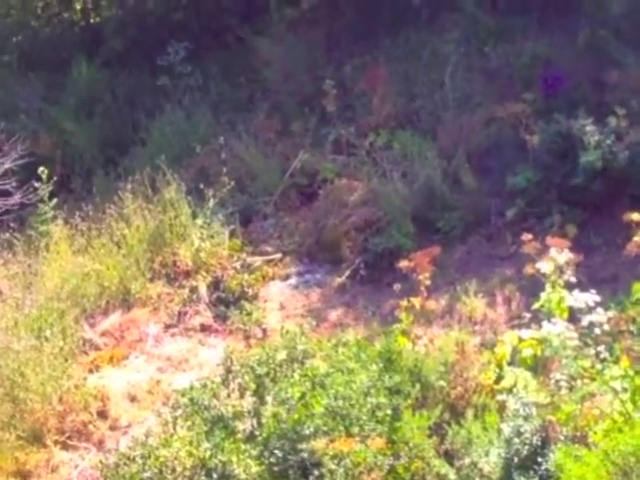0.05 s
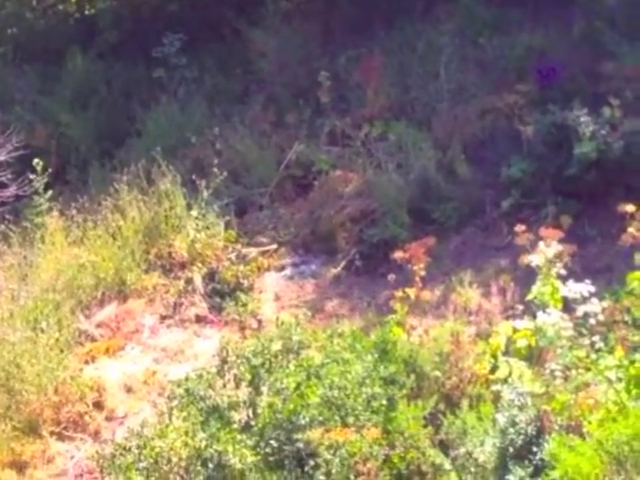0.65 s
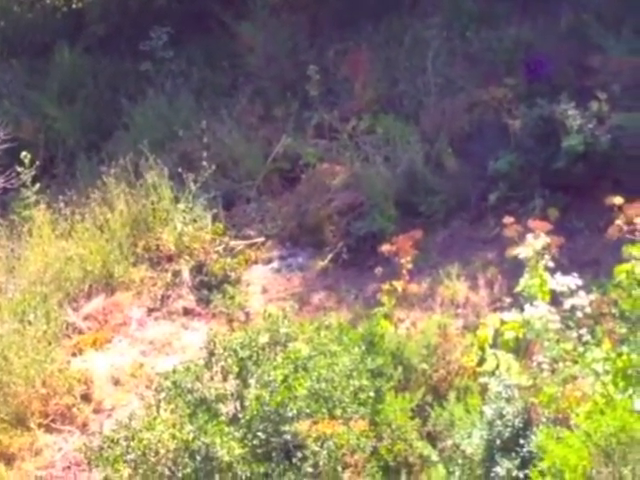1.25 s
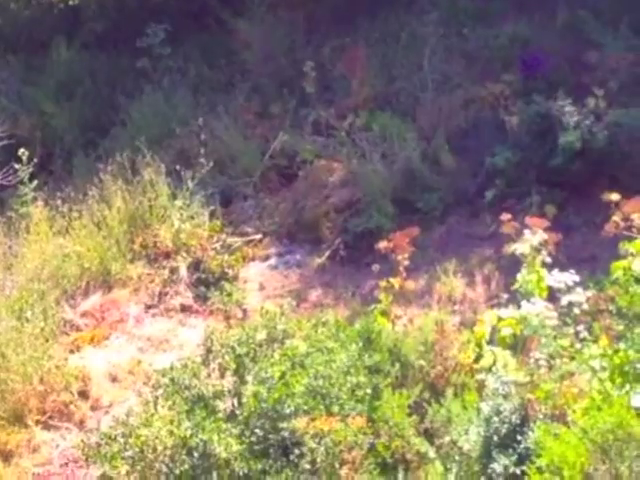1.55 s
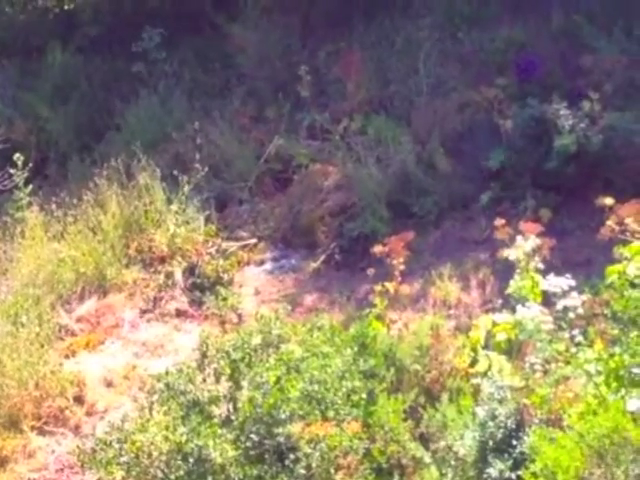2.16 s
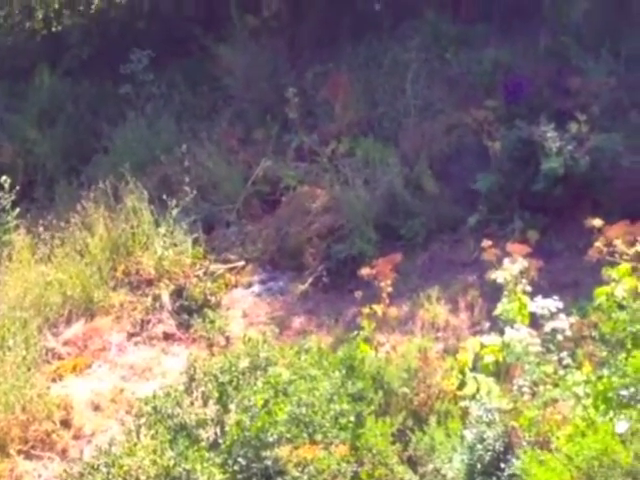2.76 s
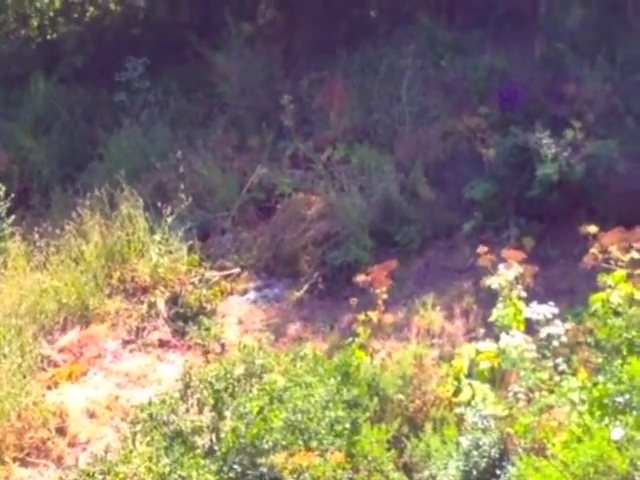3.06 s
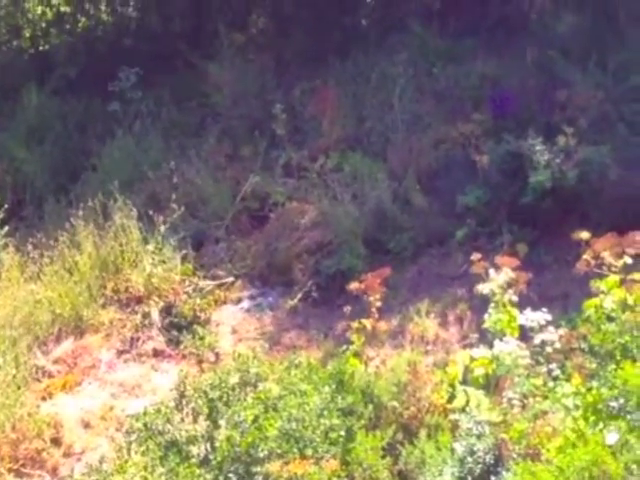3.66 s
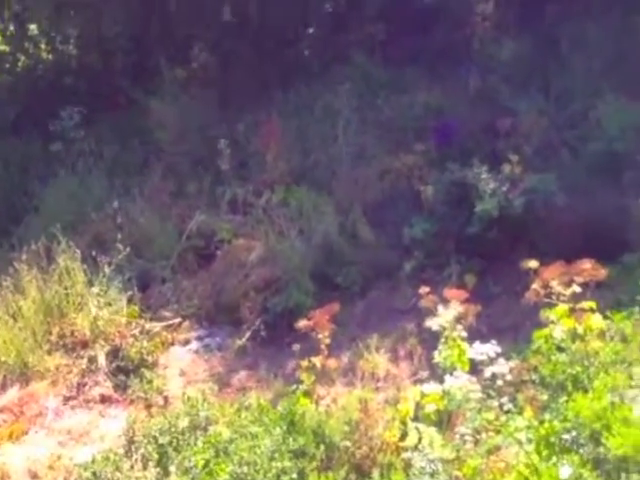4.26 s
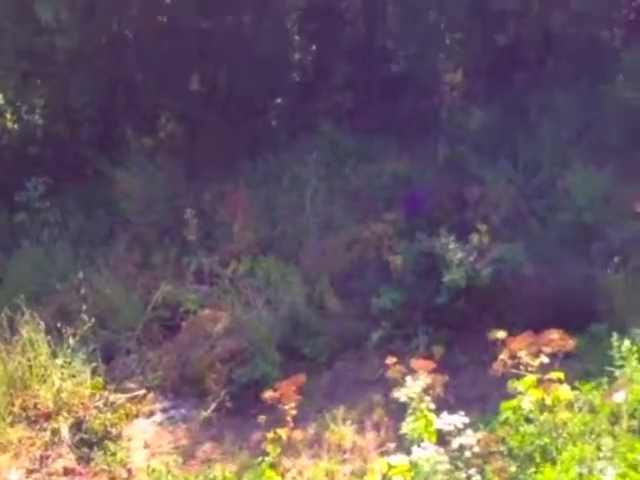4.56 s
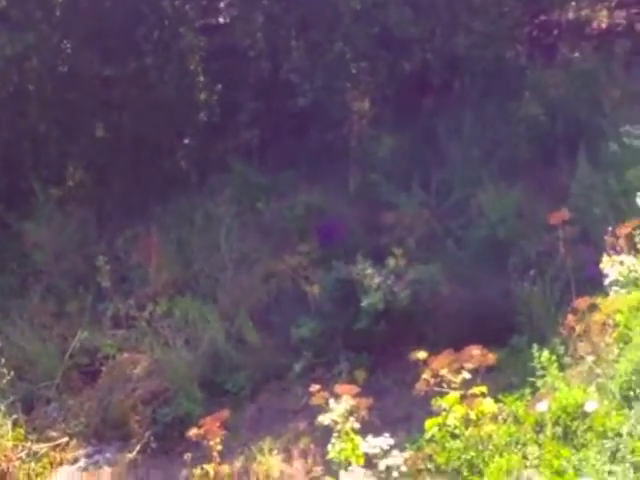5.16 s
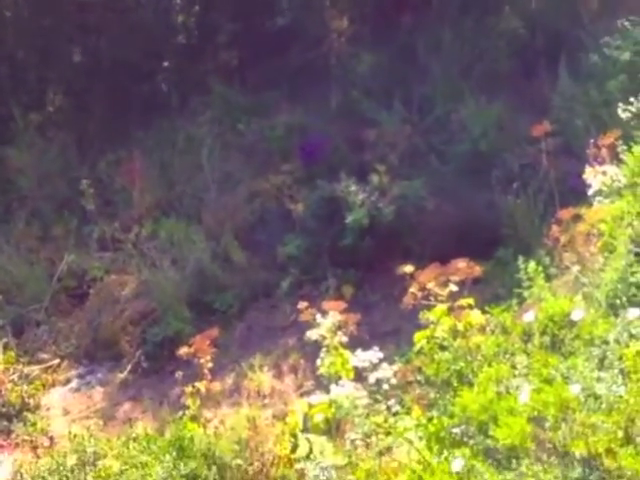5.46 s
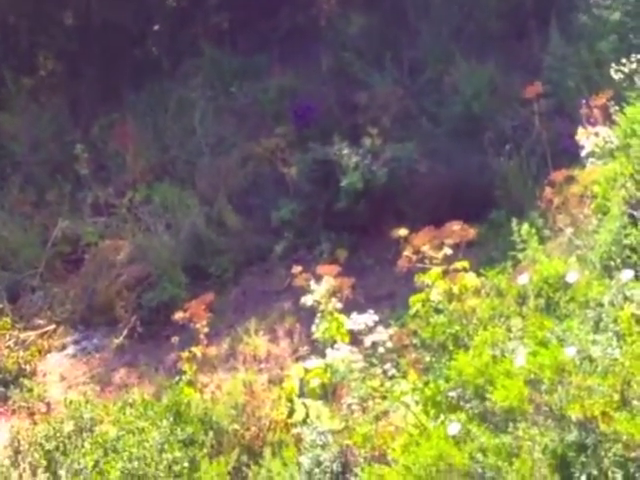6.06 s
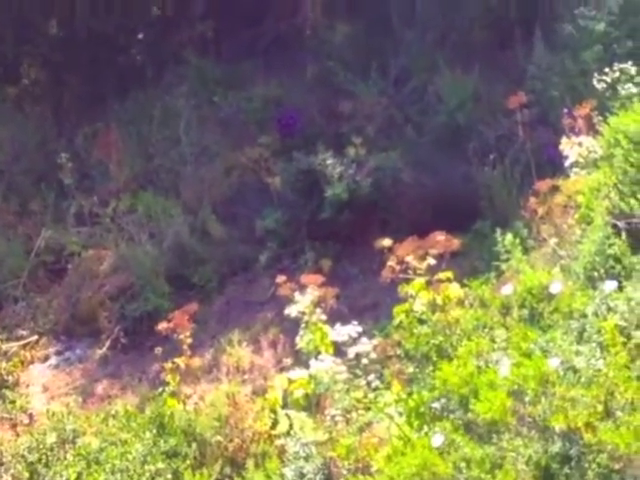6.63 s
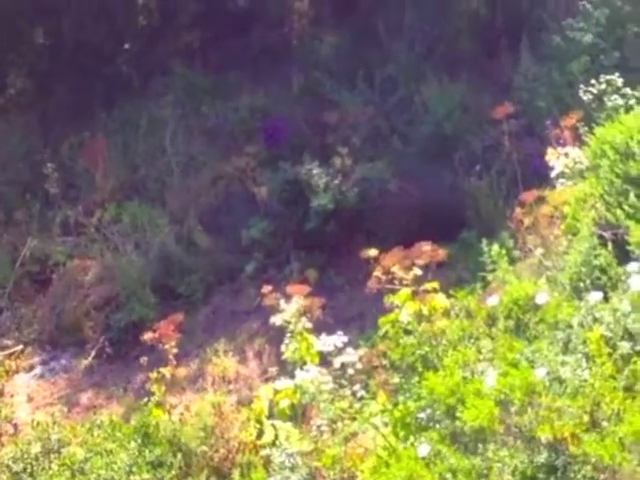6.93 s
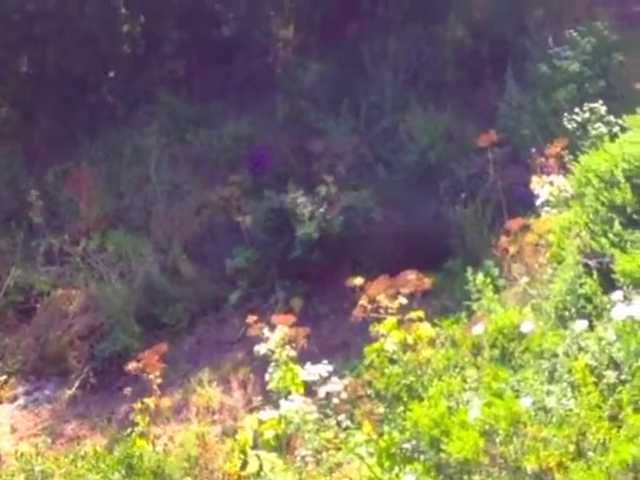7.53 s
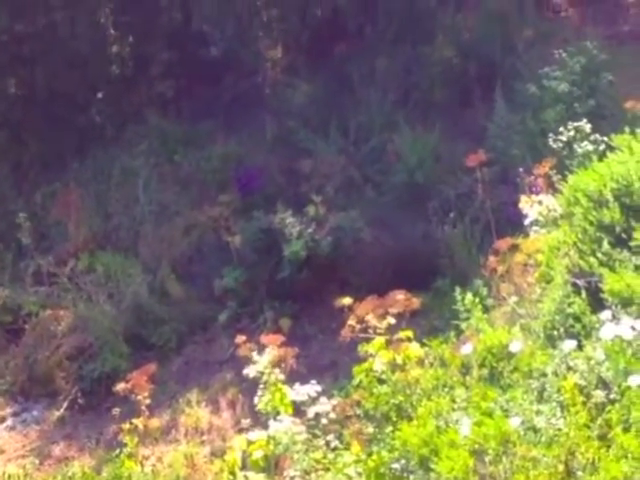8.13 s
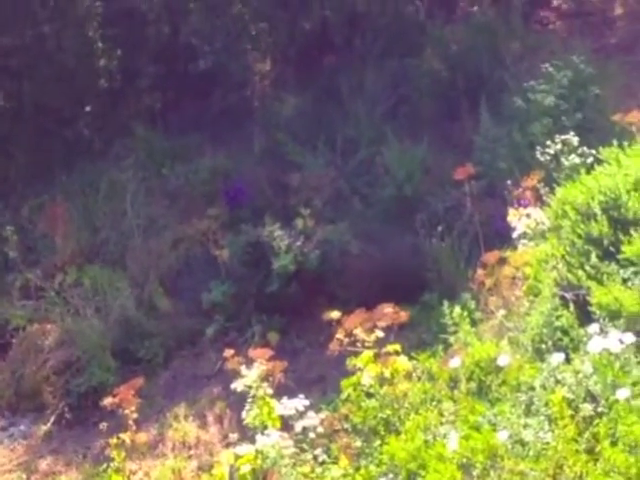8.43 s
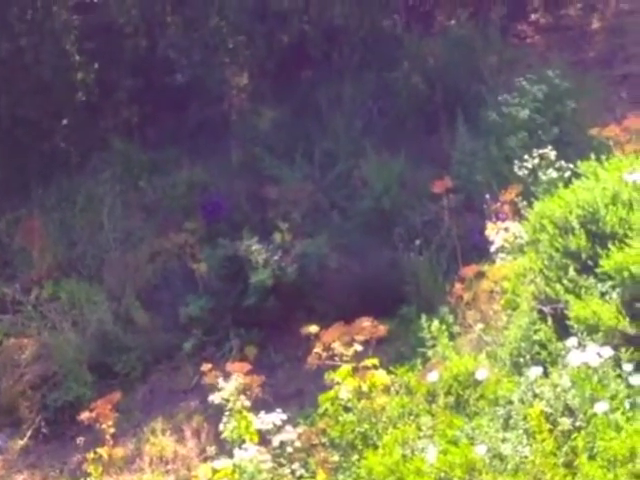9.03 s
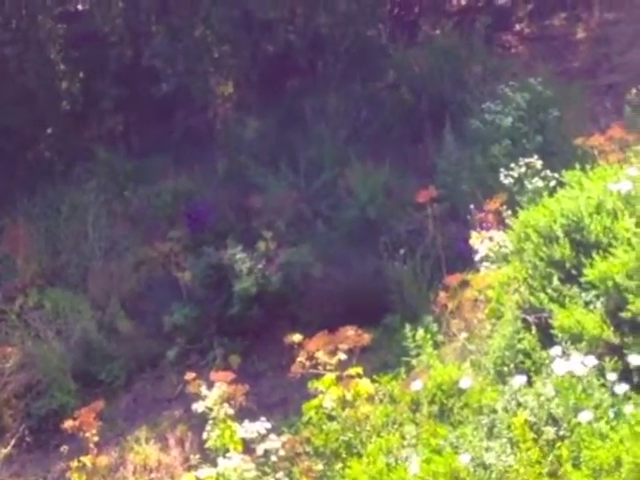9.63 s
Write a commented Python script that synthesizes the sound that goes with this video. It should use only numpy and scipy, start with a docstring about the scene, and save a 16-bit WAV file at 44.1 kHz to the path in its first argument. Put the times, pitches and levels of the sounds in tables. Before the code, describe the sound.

Wind thumps and flutters on the microphone of a hand-held camera on a brushy hillside, over the steady low rush of a far valley. Small birds chirp, whistle and trill faintly. The hand rustles and ticks lightly on the plastic case, which gives one sharp snap about halfway, then a duller tap. Near the end the gusts ease and a distant engine drones faintly.

```python
"""Gusts of wind thump and flutter on the microphone of a hand-held camera on a brushy hillside.
Behind them lie the steady rush of a far valley and a faint hiss. Small birds whistle, chirp and
trill, echoed by the scrub and the slope. The hand rustles and ticks on the plastic case, which
rings with one sharp snap and one duller tap. Towards the end a far engine drones faintly."""
import sys
import numpy as np
from scipy import signal
from scipy.fft import rfft, irfft, next_fast_len
from scipy.io import wavfile
from scipy.ndimage import uniform_filter1d, map_coordinates

SR = 44100
rng = np.random.default_rng(int(sys.argv[2]) if len(sys.argv) > 2 else 0)


def transcribe(signal):
    """Save signal, clipped to [-1, 1], as a 16-bit WAV file at the path in sys.argv[1]."""
    frames = np.atleast_2d(signal).T
    limited = np.clip(frames, -1, 1)
    pcm = np.round(limited * 32767).astype(np.int16)
    wavfile.write(sys.argv[1], SR, pcm)


N = 436149

# Levels in the tables are relative; the functions set the final loudness.
# the light breeze that never stops: t/s, level/dB
BREEZE_LEVEL = [(0, -56), (2.2, -58), (3.5, -58), (4.6, -55), (6.2, -59), (8, -60), (9.89, -60.5)]
# gusts on top of it: t/s of the crest, length/s, level/dB
GUST_SWELLS = [(0.033, 0.14, -42.5), (0.347, 0.058, -46), (0.502, 0.085, -42), (0.688, 0.14, -49),
               (0.886, 0.094, -51.5), (1.106, 0.062, -55), (1.57, 0.18, -52.5), (1.867, 0.096, -48),
               (2.4, .05, -51), (2.754, 0.25, -46), (3.068, 0.084, -48.5), (3.808, 0.086, -51),
               (4.021, .07, -46.5), (4.172, 0.086, -49.5), (4.35, 0.16, -47), (4.9, 0.092, -50),
               (5.105, 0.09, -44), (5.27, 0.19, -47), (5.622, 0.065, -47), (6.68, 0.046, -50),
               (7.237, .05, -54), (7.346, 0.066, -50.5), (7.633, 0.029, -53), (7.813, 0.15, -50.5),
               (8.021, 0.057, -49.5)]
# tone colour of the wind's low rumble and of its higher flutter: f/Hz, level/dB
RUMBLE_COLOUR = [(20, -51), (45, -37), (70, -18), (110, -4), (160, 2), (230, -4), (330, -23.5),
                 (500, -29.5), (800, -44), (1600, -60)]
FLUTTER_COLOUR = [(120, -19.0), (280, 9.0), (600, -14.5), (1500, -34), (4000, -60)]
# tone colour of the valley's rush, the hiss and rubbing cloth: f/Hz, level/dB
VALLEY_COLOUR = [(30, -39), (80, -17.5), (140, -8), (210, 0), (300, -2.5), (500, -8), (750, -11.5),
                 (1100, -18.5), (1600, -26), (2500, -29.5), (5000, -37), (12000, -53)]
HISS_COLOUR = [(500, 3), (2000, -5.5), (4000, 0.5), (6000, 0.5), (8200, 0), (9500, -8.5), (11000, -4),
               (13000, 1), (15000, 2.5)]
CLOTH_COLOUR = [(400, -10), (1200, -1.5), (2400, -0.5), (3000, -2.5), (3900, 0.5), (5000, 0.5), (6000, 1),
                (7400, 4), (9700, -3.5), (12000, -5.5), (15000, -5.5)]
# the hand's constant light creep on the camera: t/s, level/dB
CREEP_LEVEL = [(0, -77.5), (.8, -80), (1.8, -72), (2.3, -73.5), (3.7, -76), (4.3, -73), (4.53, -77),
               (4.9, -75.5), (5.4, -77.5), (6, -84), (6.9, -87), (7.3, -73.5), (7.65, -83), (9.89, -84)]
# strokes of hand and sleeve: t/s of the crest, length/s, level/dB
HAND_STROKES = [(1.114, .03, -72), (1.256, .04, -72), (1.523, 0.054, -69.5), (1.715, .04, -71),
                (1.772, 0.06, -68), (1.912, 0.053, -71.5), (2.12, .12, -74), (2.662, 0.044, -64.5),
                (2.893, 0.089, -69.5), (3.1, 0.043, -67), (3.413, 0.078, -70), (4.06, .045, -66.5),
                (4.103, .055, -65), (4.472, 0.027, -64), (4.59, 0.027, -70), (4.705, 0.12, -67),
                (4.81, .07, -67.5), (5.022, 0.073, -70), (5.262, 0.071, -73), (5.473, 0.1, -70.5),
                (6.324, .06, -71.5), (6.45, 0.18, -75.5), (7.05, 0.078, -67), (7.227, 0.089, -70),
                (7.351, 0.042, -69.5), (7.854, 0.076, -72.5), (8.06, 0.13, -74), (8.206, 0.056, -69),
                (8.852, .1, -76.5), (9.042, .07, -74), (9.82, .07, -72)]
# hard swirls of air hitting the microphone: t/s, peak level/dB, centre f/Hz
HARD_SWIRLS = [(.008, -30, 187), (.033, -32.5, 386), (.041, -34, 262), (.075, -29.5, 227),
               (0.506, -32.5, 168), (1.526, -38.5, 198), (2.742, -36, 202), (5.058, -38, 180),
               (5.248, -31.5, 176), (5.324, -31, 159), (5.403, -36, 159), (6.68, -42, 145),
               (7.224, -39.5, 135), (7.25, -38.5, 135)]
# small ticks of the grip: t/s, peak level/dB, centre f/Hz
GRIP_TICKS = [(0.065, -53, 8000), (1.38, -52, 8000), (3.089, -52, 5000), (4.4578, -46, 5500),
              (4.48, -42.5, 5460), (4.859, -46, 4500), (5.617, -50, 3980), (7.152, -50, 8000),
              (7.192, -52, 10000), (7.281, -57, 4000), (7.355, -54, 3800),(7.858, -49, 5400),
              (8.222, -50.5, 4200), (8.278, -48, 10000), (8.309, -53, 8000), (9.346, -56, 9000)]
# single bird notes: t/s, length/s, start f/Hz, middle f/Hz, end f/Hz, level/dB, rasp (0 to 1)
BIRD_NOTES = [ (0.08, .028, 2900, 3120, 2700, -70, 0), (0.104, .03, 2750, 3480, 3600, -70, 0),
              (0.134, .04, 3650, 3180, 2450, -65.5, 0), (0.178, .018, 3400, 4100, 4100, -71, 0),
              (0.192, .028, 4130, 3720, 3400, -68.5, 0), (0.291, .026, 2950, 2860, 2400, -71, 0.1),
              (0.317, .03, 2380, 2620, 2830, -71.5, 0), (0.441, .02, 4550, 4150, 3600, -75, .3),
              (0.884, .025, 2780, 2960, 2800, -77, 0), (0.968, 0.038, 2700, 2950, 3020, -70, .45),
              (1.128, .04, 4200, 4030, 3550, -72.5, .2), (1.18, .036, 3350, 3050, 2750, -75, 0),
              (1.408, .034, 4080, 4330, 4400, -62.5, 1), (1.438, 0.012, 4400, 4750, 5050, -57.5, 0),
              (1.451, .022, 4750, 4700, 4600, -66, 1), (1.483, .05, 4750, 4750, 4700, -70, 1),
              (1.982, 0.052, 3450, 3850, 3980, -68.5, 0), (2.468, .034, 2500, 2710, 2950, -72, .2),
              (2.494, .055, 3450, 3770, 3750, -73, 0), (2.5, .034, 5650, 5130, 4950, -61.5, .1),
              (2.838, .055, 3370, 3700, 4000, -69, .2), (2.893, .09, 3080, 3260, 3800, -66.5, .35),
              (2.925, .05, 5250, 5650, 5900, -69, .2), (2.97, .024, 4850, 4930, 5350, -65, .1),
              (2.987, .022, 3880, 4180, 4370, -61.5, 0), (3.001, 0.046, 4300, 4330, 4170, -64, 0),
              (2.996, .052, 5600, 5760, 5550, -69.5, .2), (3.627, .07, 3590, 3260, 3100, -70.5, .95),
              (4.195, 0.046, 3430, 3670, 3900, -71, 0), (5.449, 0.025, 5330, 5170, 5120, -56.5, 0),
              (5.622, .032, 5030, 5050, 5050, -66, 0), (5.735, .075, 3450, 3560, 3520, -78, .3),
              (6.905, .095, 4100, 4420, 4720, -72, 1), (7.0, .4, 4300, 4000, 3900, -78, 1),
              (8.315, .04, 6900, 7150, 7000, -75, .1)]
# trills, which are quick runs of rising pips:
# t/s, length/s, f/Hz, rise of a pip/Hz, pip rate/Hz, sounding share (0 to 1), level/dB, fade/dB
BIRD_TRILLS = [(1.471, 0.1, 4980, 805, 31, .4, -66.5, 9), (1.569, 0.42, 5090, 400, 30, .45, -73.5, 6),
               (2.538, 0.19, 5200, 700, 64, .9, -76, 4), (6.996, 0.51, 4950, 600, 27, 1, -81.5, 2)]
# one bird's repeated double chirp: t/s, delay of the second chirp/s, level/dB
CHIRP_PAIRS = [(4.361, 0.048, -64.5), (4.773, 0.037, -61.5), (5.161, .047, -60.5)]
# the falling pitch of each of these chirps: start f/Hz, middle f/Hz, end f/Hz
CHIRP_PITCH = (3480, 3430, 2520)
# how the case rings under a sharp snap and under a soft tap: f/Hz, width/Hz, level/dB
SNAP_RINGS = [(220, 150, 7), (410, 220, 1), (530, 100, -12), (1020, 220, -1), (1790, 360, -11.5),
              (2300, 300, -10), (2850, 1200, -9.5), (4460, 1100, -7), (7800, 1100, -11.5),
              (11400, 2400, -15), (13500, 2100, -10.5)]
TAP_RINGS = [(190, 120, 15.5), (402, 140, -1), (1220, 420, 10), (1770, 450, -6), (2980, 620, -7),
             (3850, 800, -32), (7900, 1200, -20)]
# a far engine coming into earshot: t/s, level/dB
ENGINE_LEVEL = [(0, -78), (7.5, -66.5), (8.4, -58), (9.1, -61), (9.35, -57.5), (9.89, -53.5)]
# the tones of its drone: multiple of the engine's cycle rate, level/dB
ENGINE_TONES = [(5, -10), (6, -4.5), (7, -1), (8, -1), (9, 2), (10, -11), (12, -6), (15, -13), (20, -9.5),
                (21, -14), (23, -16)]


def amp(db):
    """Turn decibels into a factor to multiply by."""
    return 10 ** (np.asarray(db) / 20)


def unit(x):
    """Scale x to an average strength (rms) of 1."""
    return x / np.sqrt(np.mean(x ** 2) + 1e-20)


def curve(rows):
    """Join (t/s, value) points with straight lines, one value per sample."""
    return np.interp(np.arange(N) / SR, *np.transpose(rows))


def wobble(rate, size=N):
    """A smooth curve through `rate` random values a second."""
    points = rng.standard_normal(int(size * rate / SR) + 4)
    return map_coordinates(points, [np.arange(size) * rate / SR])


def filtered(x, response):
    """Multiply each frequency in x by response(hz)."""
    size = next_fast_len(len(x) + 8192)
    return irfft(rfft(x, size) * response(np.fft.rfftfreq(size, 1 / SR)), size)[:len(x)]


def coloured(x, colour):
    """Give x a tone colour from (f/Hz, level/dB) points, at strength 1."""
    f, db = np.transpose(colour)
    return unit(filtered(x, lambda hz: amp(np.interp(np.log(hz + 1), np.log(f), db))))


def resonance(hz, centre, width):
    """A filter that rings at `centre`; the narrower it is, the longer it rings."""
    return 1j * hz * width / (centre ** 2 - hz ** 2 + 1j * hz * width)


def add(track, s, sound):
    """Mix a sound into the track, starting at s seconds."""
    part = track[round(s * SR):][:len(sound)]
    part += sound[:len(part)]


def swells(bed, events, rise):
    """A lasting level plus bell-shaped swells; `rise` is the share of each spent building up."""
    t, power = np.arange(N) / SR, amp(curve(bed)) ** 2
    for s, length, db in events:
        distance = (t - s) / (length * np.where(t < s, rise, 1 - rise))
        power = power + amp(db) ** 2 * np.exp(-np.minimum(distance ** 2, 20))
    return np.sqrt(power)


def dying_noise(size, t60):
    """A burst of noise that falls by 60 dB every t60 seconds."""
    t = np.arange(size) / SR
    return rng.standard_normal(size) * amp(-60 * t / t60)


def wind(flutter_db=-45, flutter_growth=2.09):
    """Swirling air rumbles on the microphone; the strongest gusts add a higher flutter."""
    gust = swells(BREEZE_LEVEL, GUST_SWELLS, rise=0.41)
    swirls = unit(amp(2.5 * wobble(80) + 1.44 * wobble(12)))
    rumble = gust * coloured(swirls * rng.standard_normal(N), RUMBLE_COLOUR)
    flutter = coloured(swirls * rng.standard_normal(N), FLUTTER_COLOUR)
    return rumble + amp(flutter_db) * (gust / gust.max()) ** flutter_growth * flutter


def valley(rush_db=-58, hiss_db=-71.5, patchy_db=0.8):
    """The valley's far rush, whose pitch bands swell and sink on their own, and a smooth hiss."""
    level = amp(rush_db + 0.36 * wobble(1.37))
    bands = signal.stft(rng.standard_normal(N), nperseg=512)[2]
    patches = uniform_filter1d(rng.standard_normal(bands.shape), 5, axis=0)  # smooth across pitch
    patches = uniform_filter1d(patches, 16, axis=1)  # and across time
    rush = signal.istft(bands * amp(patchy_db * unit(patches)), nperseg=512)[1][:N]
    hiss = coloured(rng.standard_normal(N), HISS_COLOUR)
    return level * coloured(rush, VALLEY_COLOUR) + amp(hiss_db) * hiss


def rustle(boost_db=3, catches_per_s=70, swish_hz=7500):
    """Cloth and skin slide in tiny grains and sometimes catch; the hardest strokes add a swish."""
    stroke = swells(CREEP_LEVEL, HAND_STROKES, rise=0.42)
    grains = amp(1.2 * wobble(900) + 1.8 * wobble(35))
    sliding = unit(grains * rng.standard_normal(N))
    catches = unit((rng.random(N) < catches_per_s / SR) * rng.uniform(-1, 1, N))
    cloth = coloured(sliding + amp(-6) * catches, CLOTH_COLOUR)
    swish = filtered(grains * rng.standard_normal(N), lambda hz: resonance(hz, swish_hz, 2400) ** 2)
    swish_gain = amp(-2) * (stroke / stroke.max()) ** 1.5
    return amp(boost_db) * stroke * (cloth + swish_gain * unit(swish))


def thumps():
    """A hard swirl of air gives the microphone one push that dies in a cycle or two."""
    out, push = np.zeros(N), signal.unit_impulse(SR // 20)
    for s, db, centre in HARD_SWIRLS:
        ring = lambda hz: resonance(hz, centre, width=0.59 * centre) ** 2
        bump = filtered(push, lambda hz: ring(hz) / (1 + .5j * hz / centre) ** 2)  # softens the highs
        add(out, s - .5 / centre, amp(db) * bump / np.abs(bump).max())  # starts half a cycle early
    return out


def ticks():
    """The grip gives way in short dry ticks."""
    out = np.zeros(N)
    for s, db, centre in GRIP_TICKS:
        burst = dying_noise(SR // 40, t60=0.01)
        tick = filtered(burst, lambda hz: resonance(hz, centre, width=centre) ** 2)
        add(out, s, amp(db) * tick / np.abs(tick).max())
    return out


def bird_notes(trim_db=-3.2, rasp_hz=560, shakes_per_s=150, waver_hz=45, chirp_rasp=0.2):
    """Birds whistle gliding notes and double chirps; a fast shake in pitch makes some rasp."""
    song, chirps = np.zeros(N), []
    for s, delay, db in CHIRP_PAIRS:
        chirps.append((s, .025, *CHIRP_PITCH, db, chirp_rasp))
        chirps.append((s + delay, .019, *CHIRP_PITCH, db, chirp_rasp))
    for s, length, start, middle, end, db, rasp in BIRD_NOTES + chirps:
        progress = np.linspace(0, 1, int(length * SR))
        glide = np.polyval(np.polyfit([0, .5, 1], [start, middle, end], 2), progress)
        shake = rasp * rasp_hz * np.sin(2 * np.pi * shakes_per_s * length * progress)
        pitch = glide + shake + waver_hz * wobble(700, len(progress))
        tone = np.sin(2 * np.pi * np.cumsum(pitch) / SR)
        swell = np.sqrt(np.abs(np.sin(np.pi * progress))) * amp(2.3 * wobble(160, len(progress)))
        add(song, s, amp(db + trim_db) * unit(swell * tone))
    return song


def hillside_echo(calls):
    """Nearby scrub smears each call; the slope adds a faint longer echo."""
    size = SR // 2
    scrub = amp(-5.5) * unit(dying_noise(size, t60=0.25))
    slope = amp(-7) * unit(dying_noise(size, t60=0.7))
    return calls + signal.fftconvolve(calls, (scrub + slope) / np.sqrt(size))[:N]


def bird_trills(trim_db=-0.5, waver_hz=45):
    """Birds sing fading runs of short pips, each rising in pitch."""
    song = np.zeros(N)
    for s, length, hz, rise_hz, rate, share, db, fade_db in BIRD_TRILLS:
        progress = np.linspace(0, 1, int(length * SR))
        pip = np.minimum((rate * length * progress) % 1 / share, 1)  # runs from 0 to 1 in each pip
        pulses = np.sin(np.pi * pip) ** 2 * amp(2.3 * wobble(160, len(progress)))
        pitch = hz + rise_hz * (pip - .5) + waver_hz * wobble(300, len(progress))
        tone = np.sin(2 * np.pi * np.cumsum(pitch) / SR)
        add(song, s, amp(db + trim_db - fade_db * progress) * unit(pulses * tone))
    return song


def knock(s, rings, level_db, bass_hz, soft_hz, chatter_db, hollow_hz, hollow_width_hz):
    """One brief push and its dying chatter ring the case; a soft contact lacks high tones."""
    size, push = SR // 10, np.zeros(N)
    chatter = unit(dying_noise(size, t60=0.031)) / np.sqrt(size)
    add(push, s, signal.unit_impulse(size) + amp(chatter_db) * chatter)
    case = lambda hz: sum(amp(db) * resonance(hz, centre, width) for centre, width, db in rings)
    contact = lambda hz: (1j * hz / (bass_hz + 1j * hz)) ** 2 / np.sqrt(1 + (hz / soft_hz) ** 8)
    hollow = lambda hz: 1 - resonance(hz, hollow_hz, hollow_width_hz)  # a missing band sounds hollow
    ring = filtered(push, lambda hz: case(hz) * contact(hz) * hollow(hz))
    return amp(level_db) * ring / np.sqrt(np.sum(ring ** 2) / (SR / 100))  # level over 0.01 s


def held_whistle(s=5.468, length=0.31, hz=5060, level_db=-75, fade_db=7, waver_hz=14):
    """One bird call lingers as a thin, fading tone."""
    song, progress = np.zeros(N), np.linspace(0, 1, int(length * SR))
    pitch = hz + waver_hz * wobble(300, len(progress))
    tone = np.sin(2 * np.pi * np.cumsum(pitch) / SR)
    swell = np.sqrt(np.abs(np.sin(np.pi * progress))) * amp(3 * wobble(41, len(progress)))
    add(song, s, amp(level_db - fade_db * progress) * unit(swell * tone))
    return song


def engine(cycle_hz=24.58, drift=0.004017, fading_db=3):
    """A far engine drones; each tone fades in and out on its way through the moving air."""
    phase = 2 * np.pi * np.cumsum(cycle_hz * (1 + drift * wobble(3))) / SR
    drone = np.zeros(N)
    for multiple, db in ENGINE_TONES:
        level = amp(db + fading_db * wobble(8))
        drone += level * np.sin(multiple * phase + rng.uniform(0, 2 * np.pi))
    return amp(curve(ENGINE_LEVEL)) * unit(drone)


def scene():
    """Mix the outdoor sounds and the hand's noises on the camera into one channel."""
    snap = knock(4.4418, SNAP_RINGS, level_db=-23.5, bass_hz=129, soft_hz=17000,
                 chatter_db=-19, hollow_hz=775, hollow_width_hz=110)
    tap = knock(4.8322, TAP_RINGS, level_db=-36.5, bass_hz=90, soft_hz=7340,
                chatter_db=-38, hollow_hz=570, hollow_width_hz=200)
    outdoors = wind() + thumps() + valley() + engine()
    birds = hillside_echo(bird_notes() + bird_trills() + held_whistle())
    return (outdoors + birds + rustle() + ticks() + snap + tap)[None]


def record(dry, top_hz=15100):
    """The camera sharply cuts off everything above top_hz."""
    cutoff = lambda hz: 1 / np.sqrt(1 + (hz / top_hz) ** 240)
    return np.array([filtered(channel, cutoff) for channel in dry])


dry = scene()
out = record(dry)
transcribe(out)
```